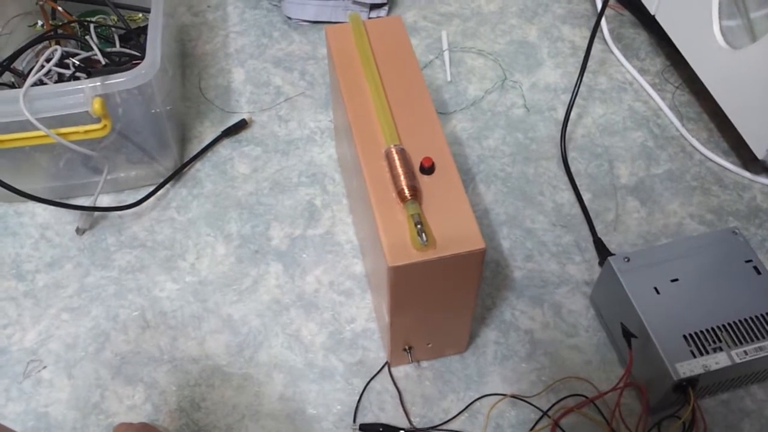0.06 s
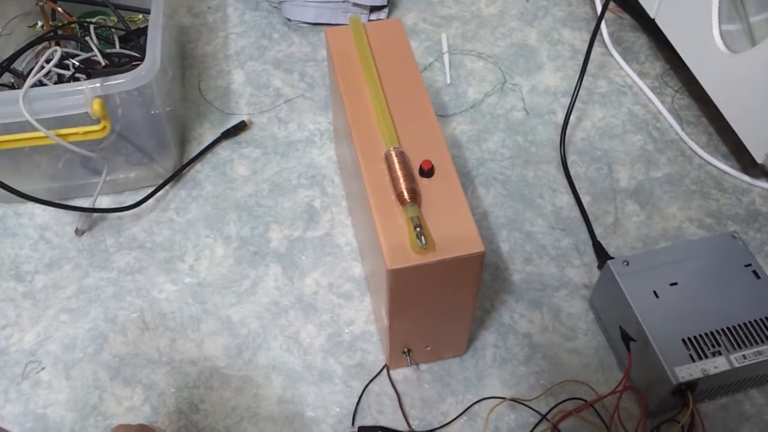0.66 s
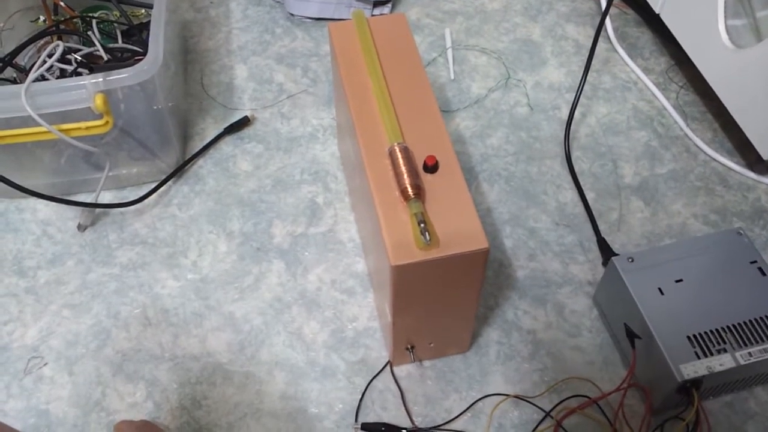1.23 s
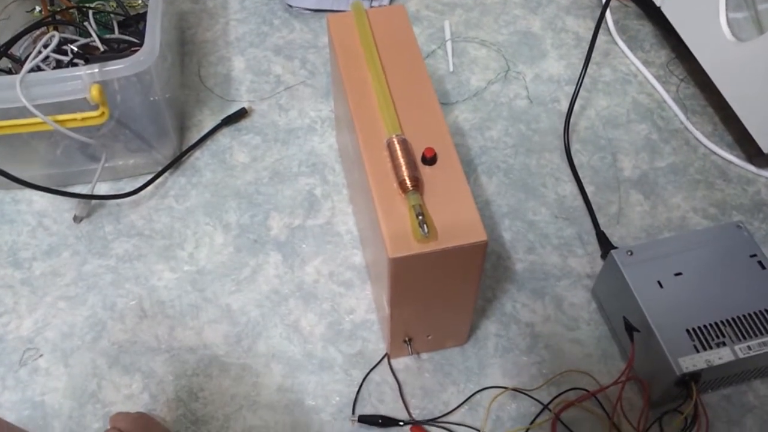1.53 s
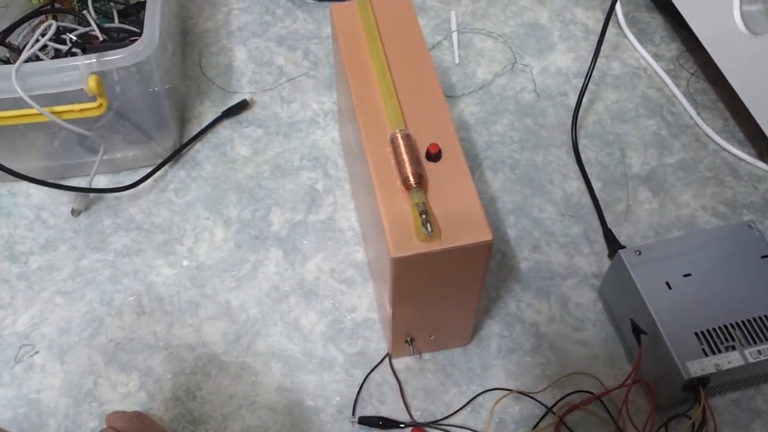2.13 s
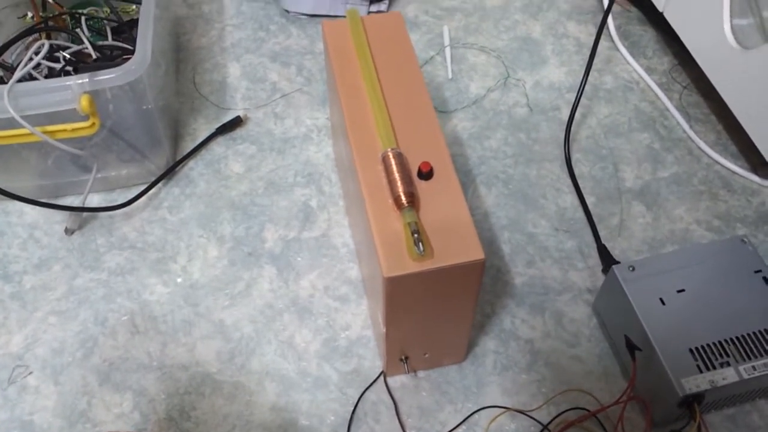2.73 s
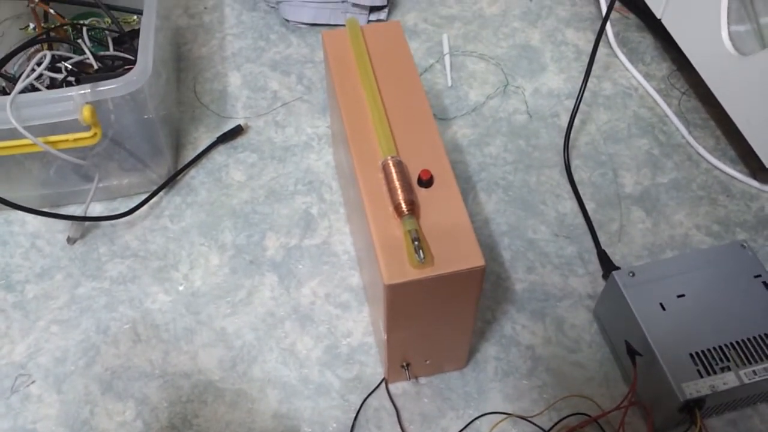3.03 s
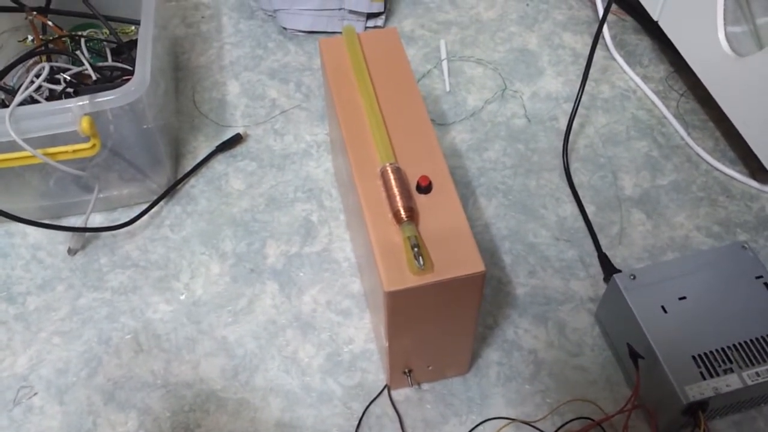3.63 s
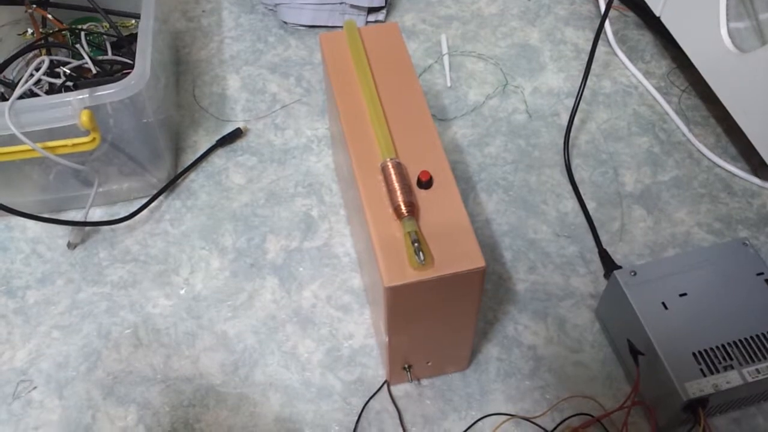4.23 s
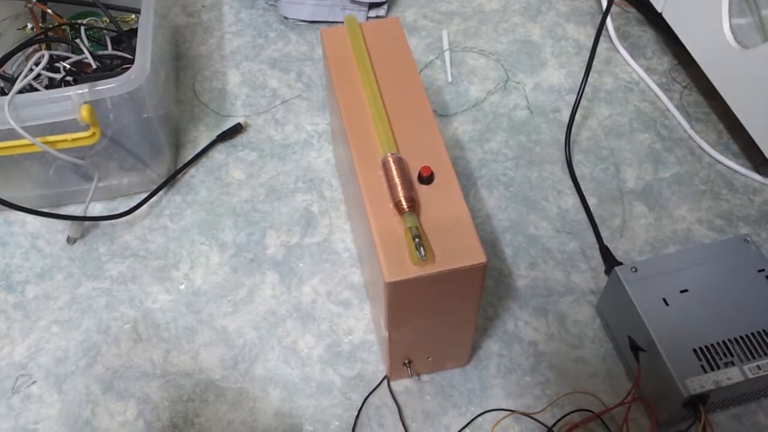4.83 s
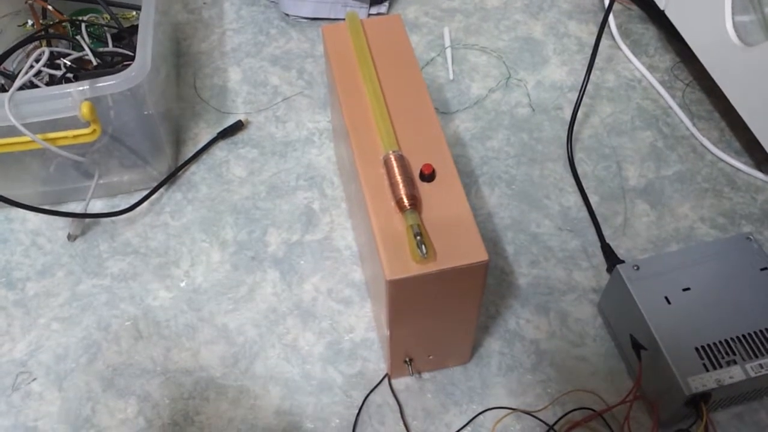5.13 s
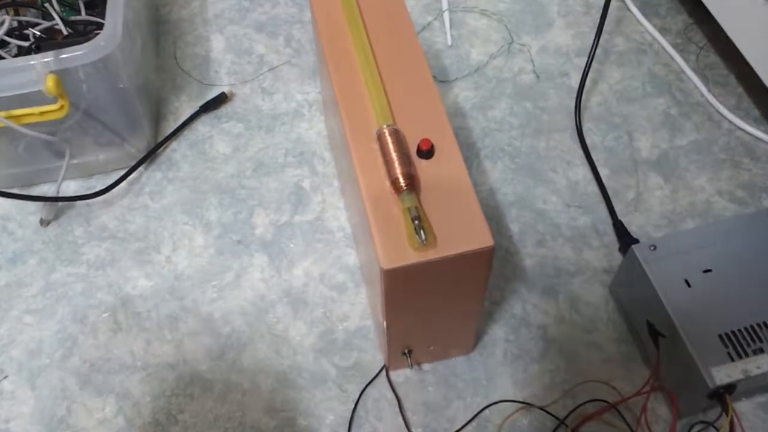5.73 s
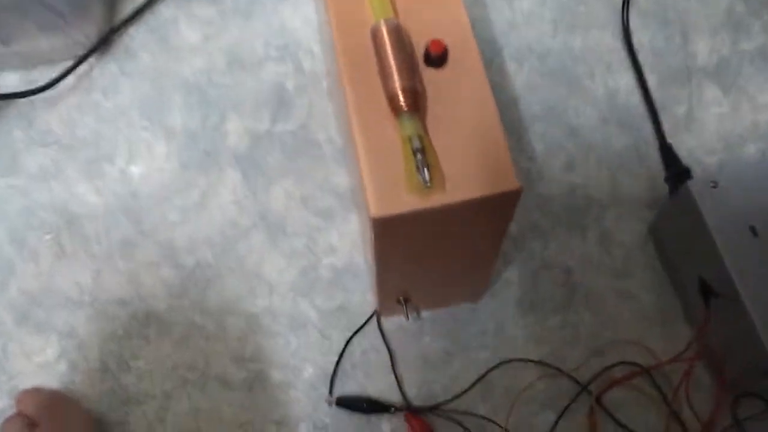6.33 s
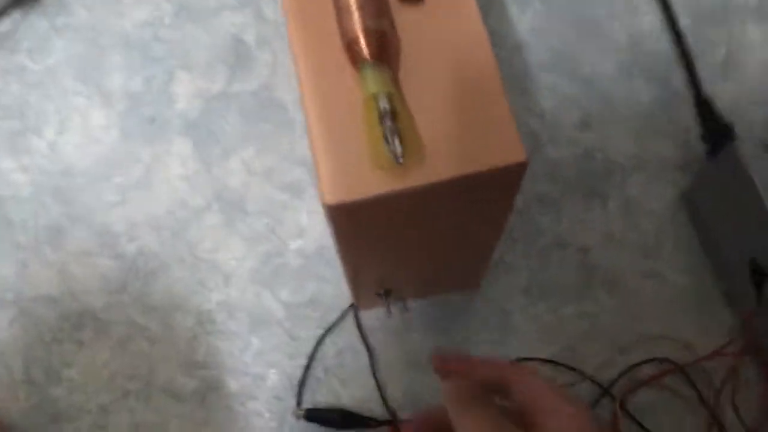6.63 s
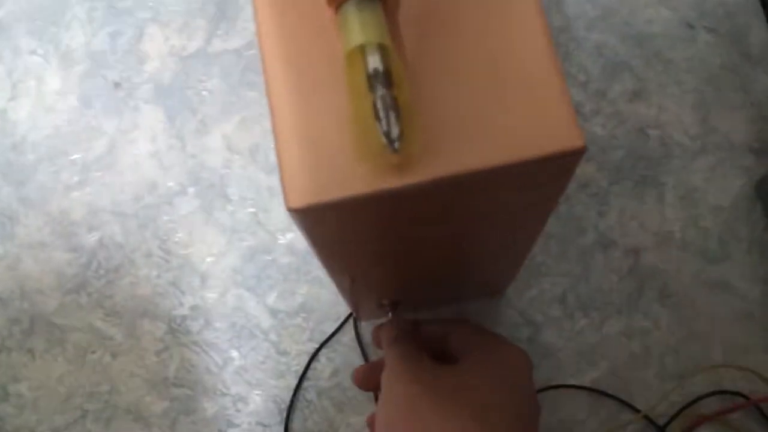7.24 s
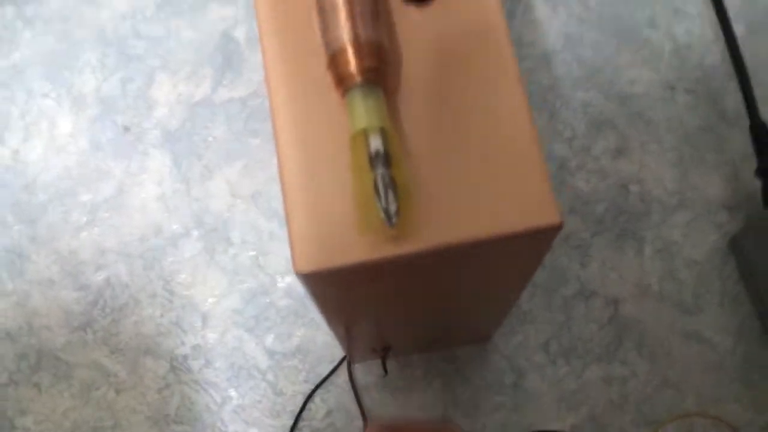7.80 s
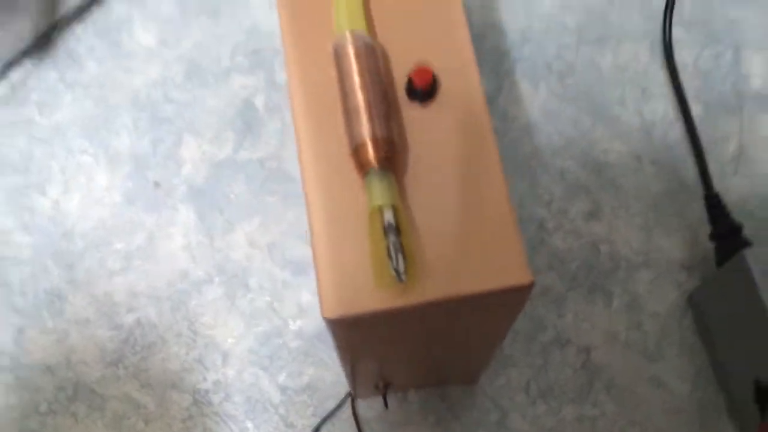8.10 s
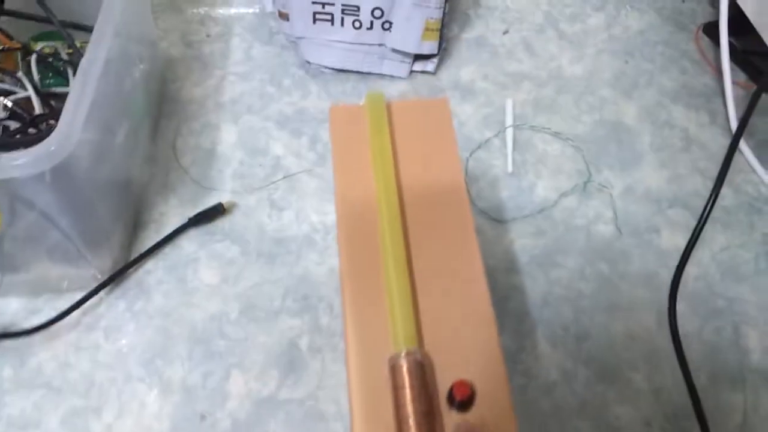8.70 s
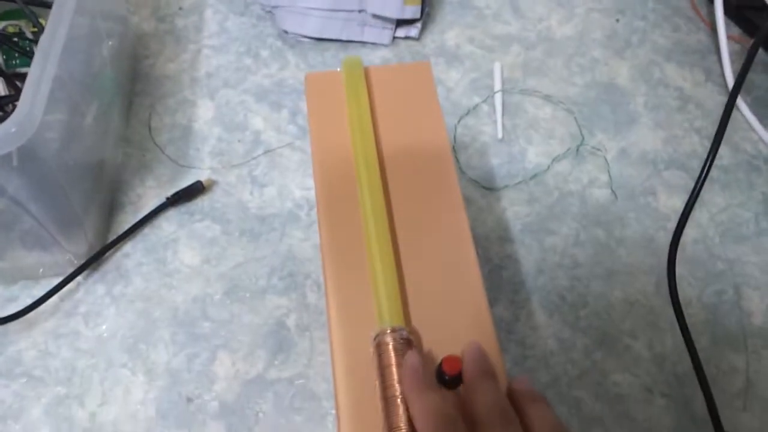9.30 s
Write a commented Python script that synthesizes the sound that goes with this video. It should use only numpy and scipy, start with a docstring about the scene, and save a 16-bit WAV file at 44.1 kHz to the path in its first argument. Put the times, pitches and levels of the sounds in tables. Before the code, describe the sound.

A thin, high electronic whine wavers and fades over a faint fan, until a switch snaps sharply and cuts it off.

```python
"""A small room: a homemade coil gun charges on the floor. Its converter's transformer whines at the
switching rate, rising as the capacitors fill. The whine swells and fades as a hand-held microphone
drifts through its standing waves, until a toggle switch snaps it off and rings the box.
Behind it a power supply fan runs and a distant engine drones past; handling adds soft knocks,
rubs and taps."""
import sys
import numpy as np
from scipy import signal
from scipy.fft import rfft, irfft, next_fast_len
from scipy.io import wavfile
from scipy.ndimage import map_coordinates

SR = 44100
rng = np.random.default_rng(int(sys.argv[2]) if len(sys.argv) > 2 else 0)


def inscribe(sig):
    """Save sig as 16-bit PCM at rate SR to the path in sys.argv[1].

    A 1-D sig is mono; a 2-D sig holds one channel per row.
    Samples are clipped to [-1, 1] before scaling.
    """
    pcm = np.round(np.clip(np.atleast_2d(sig).T, -1, 1) * 32767)
    wavfile.write(sys.argv[1], SR, pcm.astype(np.int16))


N = 421596
TIME_S = np.arange(N) / SR

# room and fan rush: (frequency [Hz], relative density [dB])
RUSH_SPECTRUM = [(12, -70.5), (20, -36), (45, -5), (70, 3), (235, 1), (265, 1), (294, 1), (406, -1.5),
                 (431, -1), (467, -0.5), (840, -3), (1090, -3.5), (1390, -5.5), (2500, -12), (3250, -42.5),
                 (5500, -120)]
# hiss: (frequency [Hz], relative density [dB])
HISS_SPECTRUM = [(800, -25), (1800, 1), (2600, 4), (4500, 2.5), (6000, 0), (6600, -4.5), (7200, -10),
                 (7500, -12.5), (7750, -42.5), (9000, -64)]
# room decay: (frequency [Hz], t60 [s])
ROOM_DECAY = [(300, 0.34), (1500, 0.16), (6000, 0.19)]
# fan blade tone: (time [s], pitch [Hz], level [dB])
BLADE_TONE = [(0, 1286, -66), (2, 1280, -65.5), (4, 1273, -68), (5, 1238, -67), (6.5, 1253, -80),
              (9.56, 1261, -76)]
# fan motor: (frequency [Hz], level [dB])
MOTOR_TONES = [(1965, -75), (2353, -79), (2455, -85.5)]
# engine speed: (time [s], firing rate [Hz])
FIRING_RATE = [(0, 67.53), (1.2, 68.73), (2.3, 67.24), (4, 67.16), (5.5, 65.3), (9.56, 65.35)]
# higher engine orders: (multiple of firing rate, relative level [dB])
EXHAUST_ORDERS = [(5, -15), (6, -6), (7, -8.5), (8, -24), (9, -9.5), (16, -23.5), (21, -20), (22, -16)]
# engine passing: (time [s], fourth-order level [dB], higher-order gain [dB])
ENGINE_LEVELS = [(0, -62.5, -63.5), (1, -65, -62.5), (1.4, -55.5, -56), (2.05, -52.5, -50),
                 (2.5, -52.5, -59.5), (2.8, -63.5, -55), (3.5, -62, -59), (4.4, -64, -62.5),
                 (7, -67.5, -66.5), (9.56, -78, -68.5)]
# skin and sleeve brushes: (time [s], level [dB])
RUB_EVENTS = [(1.25, -47), (2.219, -53), (3.25, -49), (7.25, -46), (9.245, -47.5)]
# fingertip contacts: (time [s], level [dB], t60 [s])
TAP_EVENTS = [(8.79, -56, 0.72), (8.97, -58, 0.14), (9.346, -47, 0.054), (9.543, -34.5, 0.033)]
# gun under a fingertip: (centre [Hz], half-width [oct], relative level [dB])
TAP_BANDS = [(1096, .1, 0.5), (2134, .12, -4.5)]
# handling knocks: (time [s], thud level [dB], tick level [dB], t60 [s])
KNOCK_EVENTS = [(2.126, -50, -47.5, 0.22), (3.296, -40, -54, 0.09), (3.805, -43, -54, .1),
                (4.489, -43, -45.5, 0.29), (4.503, -41, -46.5, 0.17), (4.623, -60, -49.5, 0.17),
                (5.582, -48.5, -58, .14), (6.63, -58, -49.5, .1), (6.937, -50, -49.5, 0.34),
                (7.085, -53, -43, 0.053), (7.298, -63, -46, .05), (9.394, -52, -55, 0.19)]
# hollow thud of a knock: (centre [Hz], half-width [oct], relative level [dB])
THUD_BANDS = [(557, 0.57, -0.5)]
# ringing tick of a knock: (centre [Hz], half-width [oct], relative level [dB])
TICK_BANDS = [(1579.6, 0.22, -1.5), (3110, 0.17, -2), (4650, 0.54, -7)]
# toggle contacts: (time [s], level [dB], box ring gain [dB], crack t60 [s], crack tilt [dB/oct])
SWITCH_CONTACTS = [(7.369, -12, -2.5, 0.011, 3.5), (7.3725, -30, 15, .04, -1), (7.4, -38.5, 7, 0.13, -4),
                   (7.4132, -9, -1.5, 0.01, 4), (7.4182, -6.5, 2.5, 0.011, .5),
                   (7.4222, -14.5, -4, 0.03, -3), (7.4437, -32, 0, 0.066, 10), (7.654, -38, 16, .03, -6)]
# contact crack: (frequency [Hz], relative density [dB])
CRACK_SPECTRUM = [(40, -43), (150, -16), (340, -38), (450, -9), (800, -5.5), (1400, -6.5), (1900, 0),
                  (3300, -1.5), (4500, -2.5), (5900, -3), (6700, -16), (7500, -24), (8100, -47),
                  (8800, -31.5), (10000, -40)]
# box under the switch: (frequency [Hz], relative level [dB], t60 [s])
BOX_MODES = [(185, -18, .08), (425, -5, .06), (545, 0, .05), (580, -1, .04), (618, 1, .05), (830, -7, .05),
             (1130, -9, .04), (1260, -6, .04), (1750, -3, .04), (1992, -1, .04), (2220, -4, .04),
             (2398, -5, .045), (2590, -6, .04), (2715, -6, .04), (2825, 1, .04), (3070, -4, .04),
             (3358, 4, .035), (3900, -4, .035), (4110, -4, .035), (4280, -6, .035), (4620, -7, .035),
             (5610, -6, .03), (5855, -4, .03)]
# standing-wave nodes crossed: (time [s], depth [dB], half crossing time [s])
NODE_CROSSINGS = [(0.138, -30.5, 0.16), (.817, -14, 0.12), (1.269, -21, 0.13), (1.848, -15.5, .1),
                  (2.72, -12.5, .125), (3.011, -18.5, 0.11), (3.17, -18, .125), (5.677, -17, .075),
                  (5.905, -12, 0.056), (6.105, -17, .06), (6.208, -27, 0.054), (6.53, -27, 0.076),
                  (6.61, -16, .025), (6.806, -18, .05)]
# whine at the microphone, between nodes: (time [s], level [dB])
WHINE_LEVEL = [(0, -43.5), (.42, -42.5), (.56, -48.5), (.93, -44), (1.53, -49), (2.05, -62.5), (2.52, -57),
               (3.2, -62), (3.45, -56.5), (3.87, -64.5), (4.25, -58), (5.45, -58), (5.8, -62),
               (6.33, -63.5), (6.7, -65.5), (6.93, -60), (7.36, -71)]


def amp(db):
    """Decibels to gain."""
    return 10 ** (np.asarray(db) / 20)


def unit(x):
    """Scale to rms 1."""
    return x / np.sqrt(np.mean(x ** 2) + 1e-20)


def along(points, hz):
    """(frequency, value) points read on a log axis."""
    point_hz, values = np.transpose(points)
    return np.interp(np.log(hz + 1), np.log(point_hz + 1), values)


def curves(rows):
    """One value per sample for each column after the time."""
    times_s, *columns = np.transpose(rows)
    return [np.interp(TIME_S, times_s, column) for column in columns]


def wobble(rate_hz):
    """Smooth random curve through knots at rate_hz."""
    knots = rng.standard_normal(int(N * rate_hz / SR) + 4)
    return map_coordinates(knots, [TIME_S * rate_hz])


def phase(hz):
    """Running phase of a moving frequency."""
    return 2 * np.pi * np.cumsum(hz) / SR


def filtered(x, gain_db):
    """Filter by the function gain_db(frequency)."""
    n = x.shape[-1]
    padded = next_fast_len(n + 8192)
    gain = amp(gain_db(np.fft.rfftfreq(padded, 1 / SR)))
    return irfft(rfft(x, padded) * gain, padded)[..., :n]


def noise(spectrum, size):
    """Coloured noise, rms 1."""
    return unit(filtered(rng.standard_normal(size), lambda hz: along(spectrum, hz)))


def fade(t, rise_s, t60_s):
    """Quick rise, exponential decay."""
    return (1 - np.exp(-t / rise_s)) * np.exp(-np.log(1000) * t / t60_s)


def add(track, start_s, sound):
    """Mix a sound into the track."""
    part = track[round(start_s * SR):][:len(sound)]
    part += sound[:len(part)]


def puff(centre_hz, half_width_oct, rise_s, t60_s):
    """Soft contact: a noise burst in one resonance, little treble."""
    def resonance_db(hz):
        offset = np.log2((hz + 1) / centre_hz) / half_width_oct
        return -10 * np.log10(1 + offset ** 4)

    t = np.arange(SR // 3) / SR
    excitation = noise([(6000, 1.5), (7200, -15), (7900, -45)], len(t))
    return unit(filtered(excitation, resonance_db)) * fade(t, rise_s, t60_s)


def ring(bands, rise_s, t60_s):
    """One contact excites all of an object's resonances."""
    return sum(amp(db) * puff(hz, half_width_oct, rise_s, t60_s) for hz, half_width_oct, db in bands)


def air(rush_db=-53.5, hiss_db=-58.5, swell_peak_s=1.73, swell_half_s=0.76, wander_db=0.22):
    """Low rush of room and fan under a hiss; both wander and swell as the engine nears."""
    nearness = 1 / (1 + ((TIME_S - swell_peak_s) / swell_half_s) ** 2)
    rush = amp(rush_db + 2.5 * nearness) * noise(RUSH_SPECTRUM, N)
    hiss = amp(hiss_db + 2.05 * nearness) * noise(HISS_SPECTRUM, N)
    return amp(wander_db * wobble(4)) * (rush + hiss)


def room(x, delay_s=0.004):
    """Short reverberation; the bass lasts longest."""
    hz, t, spectra = signal.stft(rng.standard_normal(SR // 2), SR, nperseg=256)
    decay = np.exp(-np.log(1000) * t / along(ROOM_DECAY, hz)[:, None])
    _, tail = signal.istft(spectra * decay, SR, nperseg=256)
    response = np.pad(tail / np.linalg.norm(tail), (round(delay_s * SR), 0))
    return signal.fftconvolve(x, response)[:N]


def fan(drift=0.00512):
    """Power supply fan: faint, slightly unsteady blade and motor tones."""
    def tone(hz, db):
        return np.sqrt(2) * amp(db) * np.sin(phase(hz * (1 + drift * wobble(40))))

    blades = tone(*curves(BLADE_TONE))
    motor = sum(tone(hz, db) for hz, db in MOTOR_TONES)
    return blades + motor


def engine(order_waver_db=3, boom_waver_db=1.9, drift=0.00288):
    """Distant engine: only some orders pass the walls, each wavering on its own."""
    firing_hz, = curves(FIRING_RATE)
    boom_db, orders_db = curves(ENGINE_LEVELS)
    firing_rad = phase(firing_hz * (1 + drift * wobble(9)))
    boom = amp(boom_db + boom_waver_db * wobble(7)) * np.sin(4 * firing_rad)
    orders = sum(amp(db + order_waver_db * wobble(7.2)) * np.sin(order * firing_rad)
                 for order, db in EXHAUST_ORDERS)
    return np.sqrt(2) * (boom + amp(orders_db) * orders)


def rubs():
    """Skin and sleeve brush past: brief bright noise, soft onset."""
    out = np.zeros(N)
    for start_s, db in RUB_EVENTS:
        add(out, start_s, amp(db) * puff(centre_hz=3930, half_width_oct=0.52, rise_s=0.017, t60_s=0.28))
    return out


def taps(rise_s=0.00084):
    """Fingertips on the gun ring the same two resonances."""
    out = np.zeros(N)
    for start_s, db, t60_s in TAP_EVENTS:
        add(out, start_s, amp(db) * ring(TAP_BANDS, rise_s, t60_s))
    return out


def knocks(rise_s=0.0022):
    """Handling knocks: a hollow thud and a ringing tick die together."""
    out = np.zeros(N)
    for start_s, thud_db, tick_db, t60_s in KNOCK_EVENTS:
        thud = amp(thud_db) * ring(THUD_BANDS, rise_s, t60_s)
        tick = amp(tick_db) * ring(TICK_BANDS, rise_s, t60_s)
        add(out, start_s, thud + tick)
    return out


def switch(crack_db=-2, box_db=-21, crack_rise_s=0.00024, box_rise_s=0.0029, scatter_db=1):
    """The toggle unlatches, snaps over and bounces; each contact cracks and rings the box."""
    out = np.zeros(N)
    t = np.arange(SR // 3) / SR
    mode_hz, mode_db, mode_t60_s = np.transpose(BOX_MODES)[:, :, None]
    modes = np.sin(2 * np.pi * mode_hz * t) * fade(t, box_rise_s, mode_t60_s)
    for start_s, level_db, ring_db, t60_s, tilt_db_per_oct in SWITCH_CONTACTS:
        spectrum = [(hz, db + tilt_db_per_oct * np.log2(hz)) for hz, db in CRACK_SPECTRUM]
        crack = amp(crack_db) * noise(spectrum, len(t)) * fade(t, crack_rise_s, t60_s)
        mode_gains = amp(mode_db + scatter_db * rng.standard_normal(mode_hz.shape))
        box = amp(box_db + ring_db) * np.sum(mode_gains * modes, axis=0)
        add(out, start_s, amp(level_db) * (crack + box))
    return out


def standing_wave():
    """Whine gain: proportional to distance near a node, down to that node's depth."""
    gain = np.ones(N)
    for crossing_s, depth_db, half_s in NODE_CROSSINGS:
        distance = (TIME_S - crossing_s) / half_s
        gain *= np.hypot(distance, amp(depth_db)) / np.hypot(distance, 1)
    return gain


def ripple(rate_hz=168, lower_db=-18, upper_db=-27, decay_s=1.3):
    """Early ripple in the charging current: complex gain adding a side tone below and above."""
    rotation = np.exp(2j * np.pi * rate_hz * TIME_S)
    sidebands = amp(lower_db) / rotation + amp(upper_db) * rotation
    return 1 + sidebands * np.exp(-(TIME_S / decay_s) ** 2)


def mirror(tone, pitch_hz, edge_hz=8000, slope_db_per_hz=-0.013):
    """A tone near 8 kHz has a weaker twin, mirrored above edge_hz; the farther below it, the fainter."""
    gain = amp(slope_db_per_hz * (edge_hz - pitch_hz))
    return gain * tone * np.exp(-2j * np.pi * 2 * edge_hz * TIME_S)


def whine(start_hz=7086, climb_hz_per_s=124.5, ease_hz_per_s2=10.4, off_s=7.415,
          flutter_db=0.5, jitter_rad=0.033):
    """The transformer sings at the switching rate, climbing ever slower as the capacitors fill."""
    pitch_hz = start_hz + climb_hz_per_s * TIME_S - ease_hz_per_s2 * TIME_S ** 2 / 2
    level_db, = curves(WHINE_LEVEL)
    gain = amp(level_db + flutter_db * wobble(60)) * standing_wave()
    running = np.clip((off_s - TIME_S) / 0.003, 0, 1)
    carrier = np.exp(1j * (phase(pitch_hz) + jitter_rad * wobble(350)))
    tone = running * gain * ripple() * carrier
    return np.sqrt(2) * (tone + mirror(tone, pitch_hz)).real


def scene(room_db=-12):
    """One microphone, same in both channels; reverberation on the switch only."""
    snap = switch()
    background = air() + fan() + engine()
    handling = rubs() + taps() + knocks()
    mono = background + handling + snap + amp(room_db) * room(snap) + whine()
    return np.array([mono, mono])


def record(dry, cutoff_hz=9430, slope_db_per_hz=0.05):
    """Steep low-pass band limit."""
    return filtered(dry, lambda hz: -np.clip((hz - cutoff_hz) * slope_db_per_hz, 0, 120))


dry = scene()
out = record(dry)
inscribe(out)
```